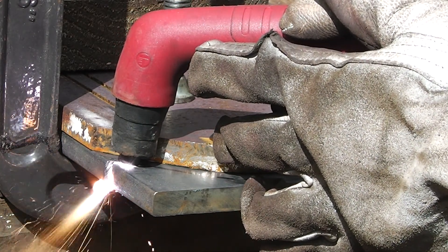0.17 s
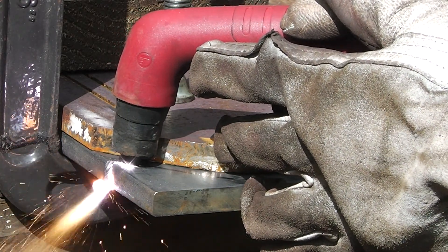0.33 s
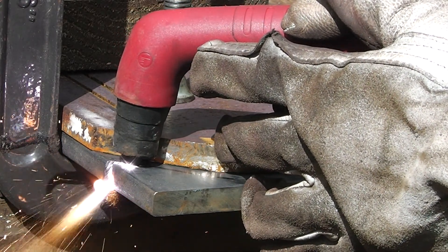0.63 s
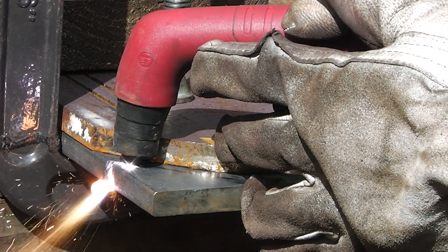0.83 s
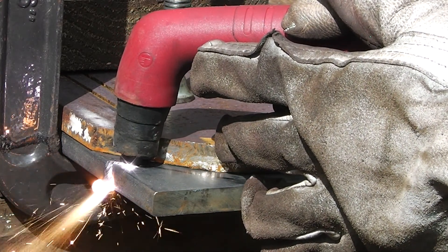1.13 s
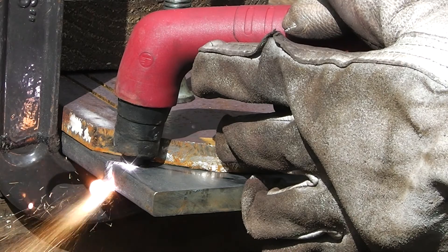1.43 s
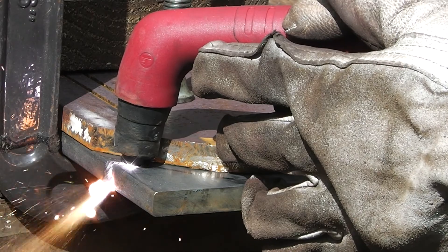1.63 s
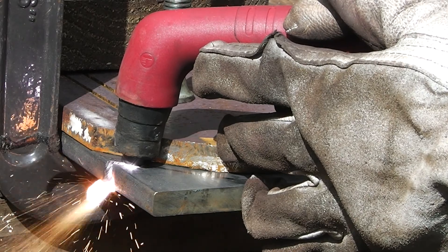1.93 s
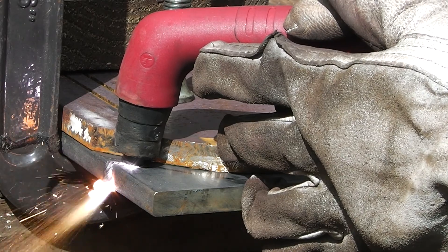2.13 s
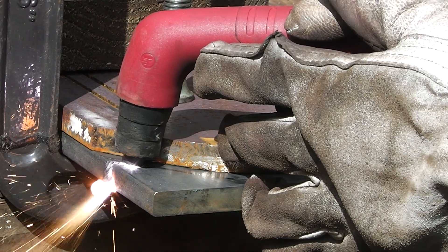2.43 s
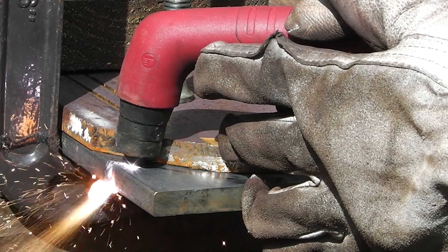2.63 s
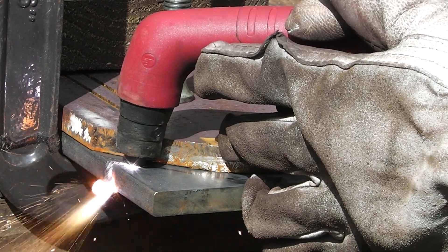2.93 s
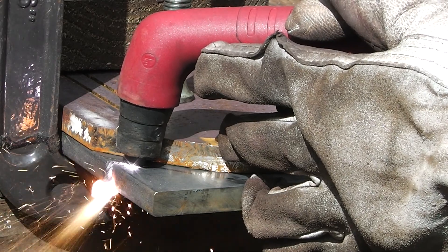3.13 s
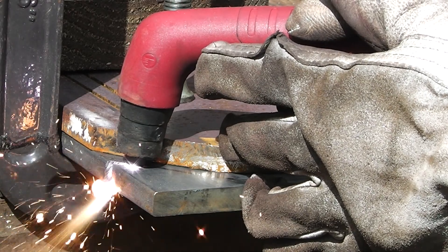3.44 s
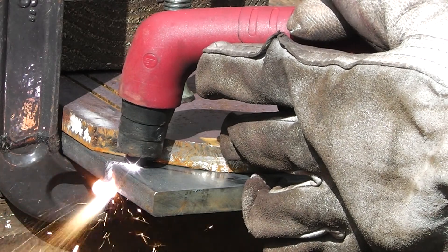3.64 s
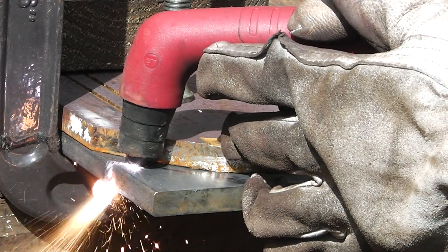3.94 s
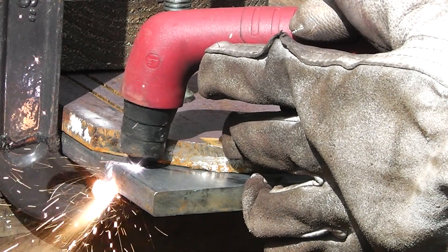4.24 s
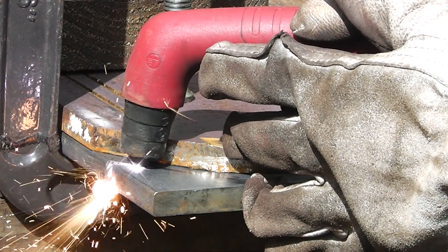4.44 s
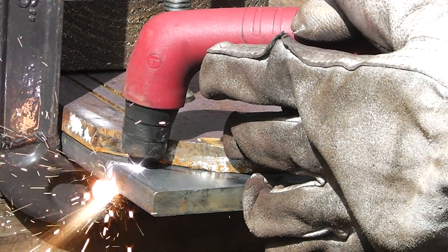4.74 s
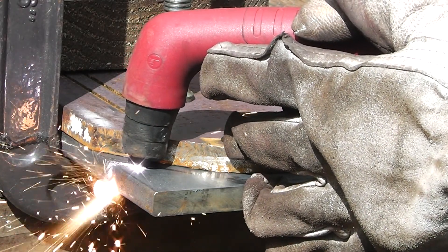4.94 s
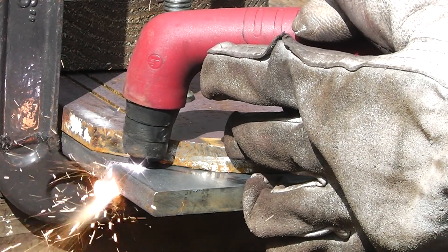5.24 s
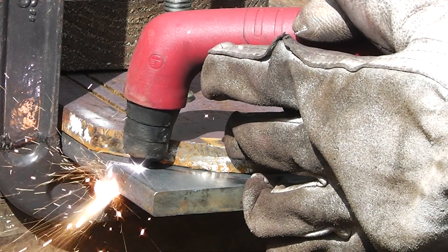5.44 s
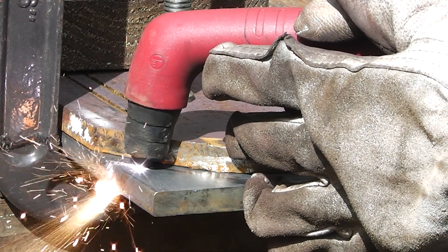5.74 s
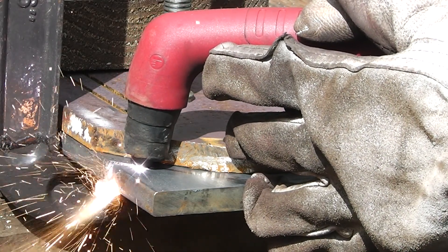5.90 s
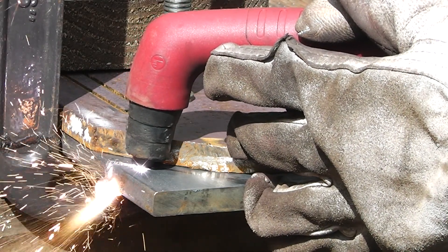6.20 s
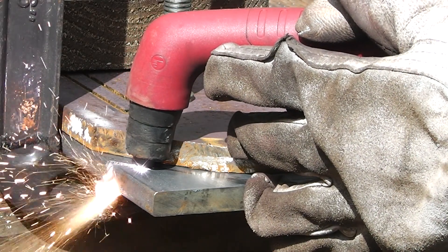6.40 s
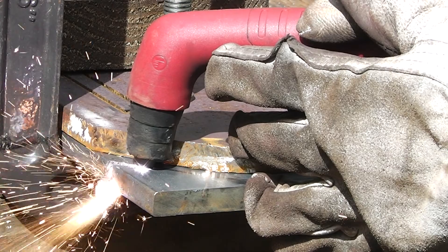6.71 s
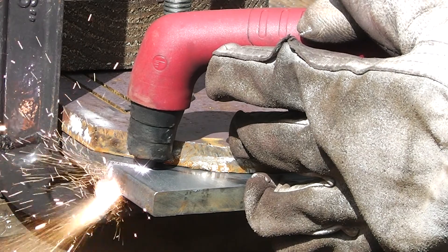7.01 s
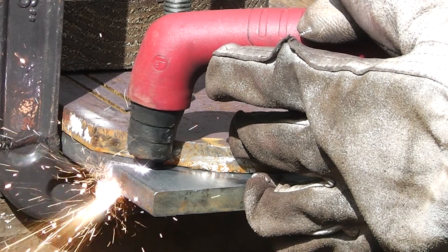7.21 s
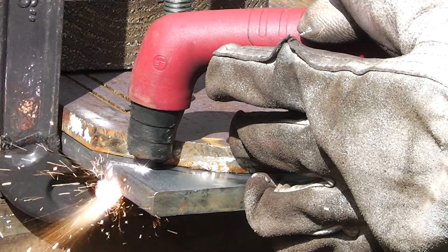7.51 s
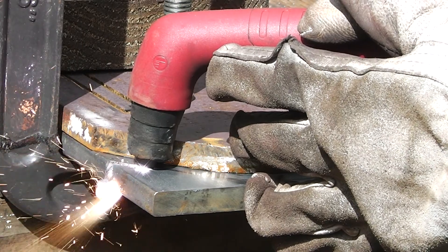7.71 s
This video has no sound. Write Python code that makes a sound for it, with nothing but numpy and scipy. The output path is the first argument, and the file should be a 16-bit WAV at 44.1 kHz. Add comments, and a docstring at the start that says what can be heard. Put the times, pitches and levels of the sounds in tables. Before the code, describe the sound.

Continuous sharp jet hiss of a plasma cutter on steel plate, quivering quickly, with quiet sputtering and scattered soft bumps beneath.

```python
"""Plasma torch cutting steel plate

A hand plasma torch cuts steadily, heard close up in stereo.
Jet: bright, fluttering hiss; filtered noise with patchy eddies, kerf comb, colour drift and early echoes.
Sputter and crackle: a dull noise rush and random short bumps, different in each ear.
Pops: a few louder bumps at set times, each in one ear.
Shared flutter and surges move hiss, sputter and crackle as the arc flares up or falters."""
import sys
import numpy as np
from scipy import signal
from scipy.fft import rfft, irfft, next_fast_len
from scipy.io import wavfile
from scipy.ndimage import uniform_filter1d

SR = 44100
rng = np.random.default_rng(int(sys.argv[2]) if len(sys.argv) > 2 else 0)


def bounce(signal):
    """Save signal as a 16-bit WAV file at the path given by the first command-line argument."""
    frames = np.transpose(np.atleast_2d(signal))
    limited = np.clip(frames, -1, 1)
    pcm = np.round(limited * 32767).astype(np.int16)
    wavfile.write(sys.argv[1], SR, pcm)


N = 346626
TIME = np.arange(N) / SR  # s


def gain_of(db):
    """Decibels to amplitude."""
    return 10 ** (np.asarray(db) / 20)


def evened(x):
    """Scales to rms 1 over all channels together."""
    return x / np.sqrt(np.mean(x ** 2) + 1e-20)


def read(points, hz, axis=1):
    """One table column, interpolated linearly over log frequency."""
    columns = np.transpose(points)
    return np.interp(np.log(hz + 1), np.log(columns[0] + 1), columns[axis])


def follow(rows, t):
    """A (time, value) table, interpolated linearly at times t."""
    return np.interp(t, *np.transpose(rows))


def bell(offset, width):
    """Smooth hump of height 1; width is the full width at half height."""
    return 2 ** -np.minimum((2 * offset / width) ** 2, 50)


def coloured(x, gain):
    """Filters x by a gain given as a function of frequency."""
    size = next_fast_len(N + 4096)
    hz = np.fft.rfftfreq(size, 1 / SR)
    return irfft(rfft(x, size) * gain(hz), size)[..., :N]


def flutter(slow_hz, fast_hz):
    """Random wavering of rms 1, strongest near slow_hz and rolled off above fast_hz."""
    def gain(f):
        return f / (f + slow_hz) ** 1.96 / (1 + (f / fast_hz) ** 2)

    return evened(coloured(rng.standard_normal(N), gain))


def patches(shape, size):
    """Random field of rms 1, smoothed over size = (bins, frames)."""
    field = rng.standard_normal(shape)
    field = uniform_filter1d(field, size=size[0], axis=0)
    return evened(uniform_filter1d(field, size=size[1], axis=1))


def pair(a, b, likeness):
    """Mixes two unrelated noises into two ears with the given likeness at each frequency."""
    mid = coloured(a, lambda f: np.sqrt((1 + np.clip(likeness(f), -1, 1)) / 2))
    side = coloured(b, lambda f: np.sqrt((1 - np.clip(likeness(f), -1, 1)) / 2))
    return np.array([mid + side, mid - side])


# rush spectrum: (frequency [Hz], relative density [dB per Hz])
SPUTTER_SPECTRUM = [(15, -17), (50, -14), (300, -8), (800, -2), (920, 1), (1000, -4.5), (1100, 1.5),
                    (1380, 2), (1460, -1), (1680, 2.5), (1950, 0), (2300, -7.5), (2700, -25), (4000, -70)]
# rush correlation between ears: (frequency [Hz], likeness [0-1])
SPUTTER_LIKENESS = [(30, 0.4), (400, 0), (900, 0.68), (1500, 0.68), (2000, 1)]


def sputter(gust, surge, level_db=-45.0, gust_db=1.0, surge_share=0.59):
    """Countless tiny bumps merged into a low rush: coloured noise that swells with the arc."""
    rush = pair(*rng.standard_normal((2, N)), lambda f: read(SPUTTER_LIKENESS, f))
    rush = evened(coloured(rush, lambda f: gain_of(read(SPUTTER_SPECTRUM, f))))
    return rush * gain_of(level_db + gust_db * gust + surge_share * surge)


# spectrum of one bump: (frequency [Hz], relative level [dB])
POP_SPECTRUM = [(10, 0.5), (40, -0.5), (400, 0.5), (900, 0.5), (1400, -3), (2000, -13), (2800, -67),
                (5000, -72)]


def pop_gain(hz):
    """Dull low-pass colour of one bump under a millisecond long."""
    return gain_of(read(POP_SPECTRUM, hz))


def crackle(gust, surge, level_db=-47.5, gust_db=1.5, surge_share=1.2, flurry_db=1.8, right_db=1.6):
    """Sparse random bumps in flurries, each mostly in one ear; they sink when the arc falters."""
    per_s, leak = 200, .15  # bumps per second and ear; share reaching the other ear
    spread_db, largest = 4.6, 2.5  # exponential size scale; cap in units of that scale
    sizes_db = spread_db * np.minimum(rng.exponential(1, (2, N)), largest)
    sizes = gain_of(sizes_db) * rng.choice([-1, 1], (2, N))
    bumps = sizes * (rng.random((2, N)) < per_s / SR)
    sound = evened(coloured(bumps + leak * bumps[::-1], pop_gain))
    flurries = flutter(slow_hz=8, fast_hz=20)
    ears_db = np.array([[-right_db], [right_db]])  # left down, right up
    arc_db = gust_db * gust + surge_share * surge
    return sound * gain_of(level_db + ears_db + arc_db + flurry_db * flurries)


# loudest pops: (time [s], peak before level_db is added [dB], ear [0 left, 1 right])
LOUD_POPS = [(0.213, -24, 0), (0.269, -22, 1), (0.611, -25, 1), (0.765, -24, 1), (0.952, -24, 1),
             (1.142, -23, 1), (1.811, -25, 1), (1.995, -21, 1), (2.033, -25, 0), (2.493, -23, 1),
             (2.865, -25, 1), (3.239, -24, 0), (3.717, -21, 1), (3.928, -23, 0), (4.222, -23, 1),
             (4.349, -25, 1), (4.405, -21, 1), (4.427, -20, 0), (5.014, -23, 1), (5.54, -21, 1),
             (5.86, -24, 1), (6.285, -23.5, 1), (6.746, -23, 1), (7.751, -21, 0)]


def pops(level_db=1.0):
    """The few large bumps, each a push or a pull in one ear."""
    kicks = np.zeros((2, N))
    for s, peak_db, ear in LOUD_POPS:
        kicks[int(ear > .5), round(s * SR)] = gain_of(peak_db + level_db) * rng.choice([-1, 1])
    return coloured(kicks, lambda f: pop_gain(f) / pop_gain(f).mean())  # unit-peak bump


def reflections(x, echo_db=-11, fade_s=0.0086, count=60):
    """Glove, plate and bench return early echoes that comb the hiss, changing as the torch travels."""
    stations_s = np.linspace(0, TIME[-1], num=14)
    out = x.copy()
    for row in np.eye(len(stations_s)):
        path = np.zeros(SR // 40)
        at = rng.integers(SR // 500, len(path), count)  # delays of 2 to 25 ms
        path[at] = rng.choice([-1, 1], count) * np.exp(-at / SR / fade_s)
        path /= np.linalg.norm(path)
        share = np.interp(TIME, stations_s, row)  # crossfade between stations
        near = np.flatnonzero(share)
        echo = signal.oaconvolve(x[:, near], path[None])[:, :len(near)]
        out[:, near] += gain_of(echo_db) * np.sqrt(share[near]) * echo
    return out


# kerf comb ripple: (time [s], signed ripple [dB])
KERF_RIPPLE = [(0, -0.1), (.65, 0.5), (1.05, -1), (1.5, -0.8), (1.8, 0), (2.15, -1.8), (2.55, 0.5),
               (2.75, -.5), (4.1, -.1), (4.8, 0.6), (5.25, 0.5), (5.6, 1.2), (5.95, 0), (6.22, -2),
               (6.42, 1), (6.75, 2), (7.05, .2), (7.86, 0.4)]
# hiss bands drifting as the torch travels: (centre [Hz], width [Hz], rate [dB per s])
BAND_DRIFT = [(5300, 800, 0), (9500, 860, -0.2), (11400, 1100, 0.17), (13500, 1000, -.08)]
RIPPLE_HZ = 4370  # comb tooth spacing


def kerf_db(hz, t):
    """Kerf colour over frequency and time: a comb of varying depth plus a steady drift."""
    comb = -np.outer(np.cos(2 * np.pi * hz / RIPPLE_HZ), follow(KERF_RIPPLE, t))
    db_per_s = sum(rate * bell(hz - f, width) for f, width, rate in BAND_DRIFT)
    return comb + np.outer(db_per_s, t - t.mean())


# broad jet spectrum: (frequency [Hz], relative density [dB per Hz])
JET_SPECTRUM = [(1500, -34), (2550, -30.6), (3450, -24.5), (4050, -13), (5400, -14.5), (6400, -8.2),
                (8200, -6.9), (9200, -3), (10800, -2.4), (11800, -1.4), (12700, -2.8), (13500, -7.2),
                (14300, -7), (15600, .2)]
# peaks and notches from torch, plate and nearby surfaces: (centre [Hz], width [Hz], height [dB])
JET_RESONANCES = [(2821, 60, 3), (3030, 104, 3.2), (3230, 75, 5), (3389, 55, 2.3), (4797, 133, 2.3),
                  (5614, 111, -3.5), (5820, 99, 3.2), (6477, 169, 2.5), (7035, 120, 4.7), (7192, 60, -2.9),
                  (8995, 80, 2), (9512, 114, 3.2)]
# two microphone ports: (frequency [Hz], likeness [0-1], left lead [rad], left minus right [dB])
MIC_PORTS = [(3000, .992, 0, 0), (6500, .997, 0, 0), (8300, .975, -.06, 0), (9700, .94, -.27, -1.4),
             (11300, .85, .14, -4.5), (12100, .7, 1.25, -4.1), (12900, .72, 2, 2.2), (13500, .4, 3.3, 3.5),
             (14100, .25, -.7, 1), (14600, .8, -.3, 0), (15400, .985, 0, 0)]


def jet_colour(hz):
    """Broad jet spectrum with its narrow resonances, as each port receives it."""
    db = read(JET_SPECTRUM, hz)
    db = db + sum(height * bell(hz - f, width) for f, width, height in JET_RESONANCES)
    # half the level and phase difference goes to each port, total power kept
    half = gain_of(read(MIC_PORTS, hz, axis=3) / 2) * np.exp(.5j * read(MIC_PORTS, hz, axis=2))
    ports = np.array([half, 1 / half]) / np.sqrt((abs(half) ** 2 + abs(half) ** -2) / 2)
    return gain_of(db) * ports


# slow jet force: (time [s], level offset [dB])
JET_FORCE = [(0.0, -0.7), (0.88, 0.3), (0.96, -0.5), (1.44, -0.5), (1.52, -1.1), (1.76, 0.5), (2.0, -0.8),
             (2.24, 0.0), (3.28, -0.4), (3.52, 0.16), (5.44, 0.05), (5.52, -0.3), (6.56, 0.15),
             (7.86, -0.05)]
JET_DB = -17  # base rms level


def jet(gust, surge, patchy_db=0.89, wander_db=0.38, gust_db=0.54, surge_share=0.23):
    """Turbulent hiss: eddies light up patches of the spectrum while its colour wanders."""
    hz, t, z = signal.stft(rng.standard_normal((2, N)), SR, nperseg=512, noverlap=384)
    eddies_db = patchy_db * patches(z.shape[1:], size=(12, 16))
    wandering_db = wander_db * patches(z.shape[1:], size=(14, 110))
    shaped = z * gain_of(kerf_db(hz, t) + eddies_db + wandering_db)
    noise = signal.istft(shaped, nperseg=512, noverlap=384)[1][:, :N]
    hiss = coloured(pair(*noise, lambda f: read(MIC_PORTS, f)), jet_colour)
    level_db = JET_DB + follow(JET_FORCE, TIME) + gust_db * gust + surge_share * surge
    return evened(reflections(hiss)) * gain_of(level_db)


# arc flares (+) and falters (-), scaled by each layer's surge_share:
# (time [s], length at half height [s], change [dB])
ARC_SURGES = [(0.233, 0.074, 5.5), (0.32, 0.06, -4), (0.427, 0.067, -3.5), (0.53, 0.06, 5),
              (0.77, 0.034, 4), (1.448, 0.054, 1.5), (1.653, 0.06, -4), (1.787, 0.058, 2),
              (2.004, 0.034, -2), (2.098, 0.081, -3.5), (2.644, 0.052, -4), (3.608, 0.048, -5),
              (3.71, 0.036, 2), (4.387, 0.36, 2.5), (4.646, 0.044, -7), (4.713, 0.042, 7),
              (4.893, 0.068, -3), (5.01, 0.04, 3.5), (5.063, 0.04, -8.5), (5.54, 0.035, 3),
              (5.647, 0.033, -6.5), (5.892, 0.032, -7.5), (5.962, 0.04, 3.5), (6.166, 0.043, -4),
              (6.9, 0.026, 3.0), (7.035, 0.032, -5), (7.562, 0.11, 3.5), (7.81, 0.09, -5.5)]


def scene():
    """One unsteadiness of the arc, quick flutter plus surges, shakes hiss, sputter and crackle alike."""
    gust = flutter(slow_hz=6.8, fast_hz=90)
    surge = sum(db * bell(TIME - s, length_s) for s, length_s, db in ARC_SURGES)
    return jet(gust, surge) + sputter(gust, surge) + crackle(gust, surge) + pops()


EDGE_HZ = 15740


def record(dry):
    """Steep linear-phase low-pass at EDGE_HZ: the microphones' band limit."""
    low_pass = signal.firwin(1023, EDGE_HZ, window=("kaiser", 9), fs=SR)
    return signal.oaconvolve(dry, low_pass[None], "same")


dry = scene()
out = record(dry)
bounce(out)
```